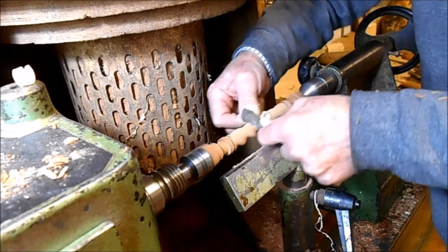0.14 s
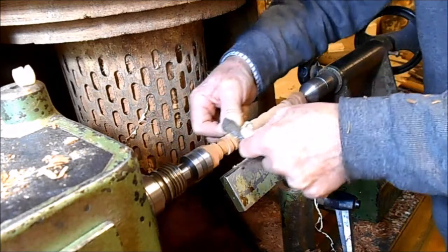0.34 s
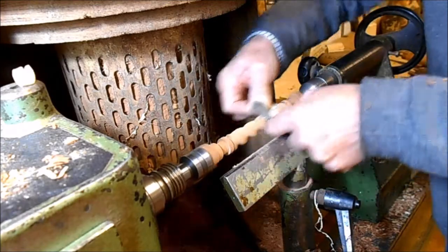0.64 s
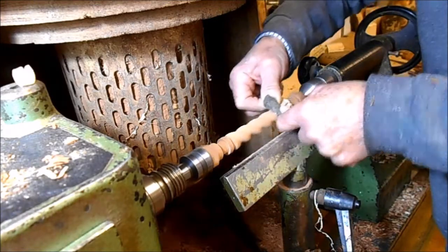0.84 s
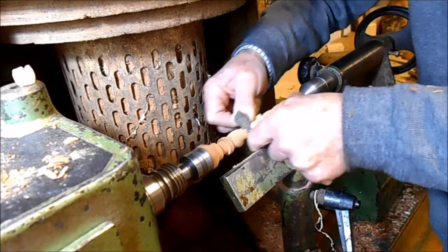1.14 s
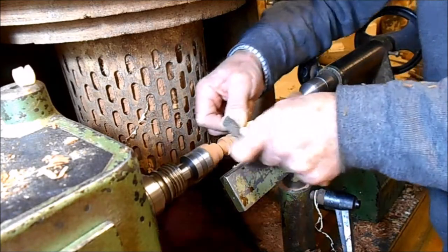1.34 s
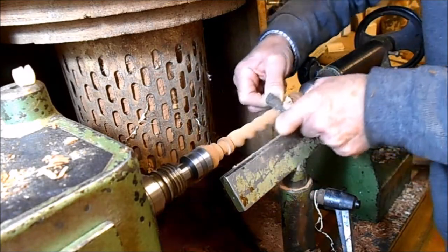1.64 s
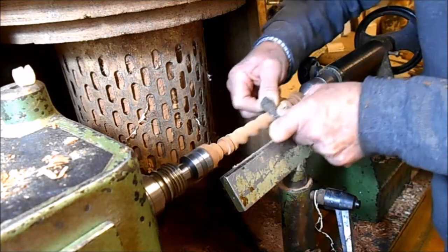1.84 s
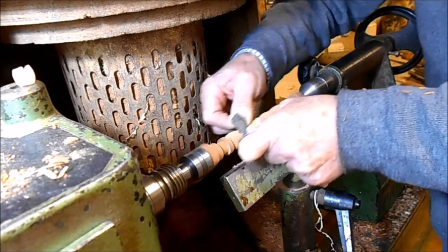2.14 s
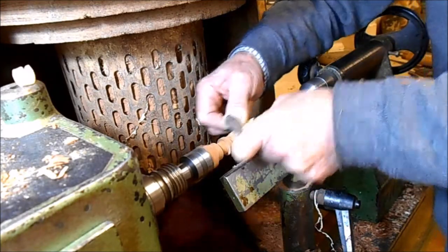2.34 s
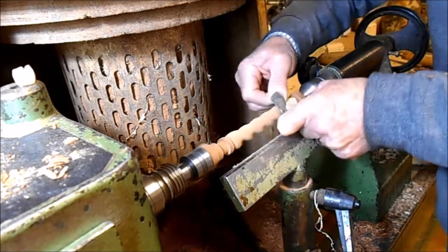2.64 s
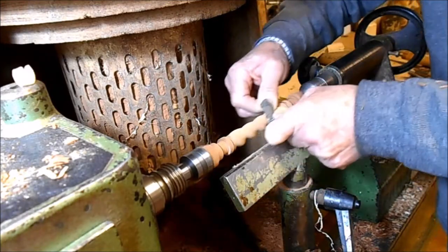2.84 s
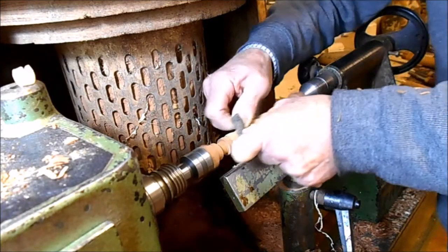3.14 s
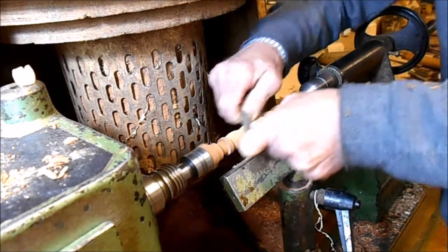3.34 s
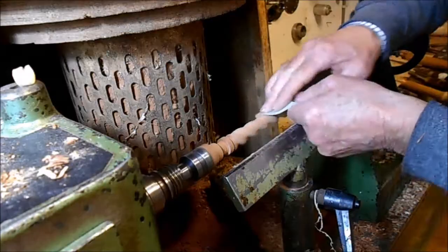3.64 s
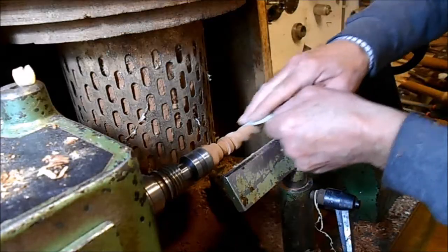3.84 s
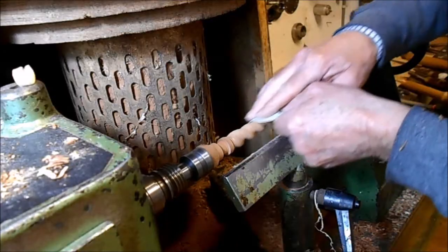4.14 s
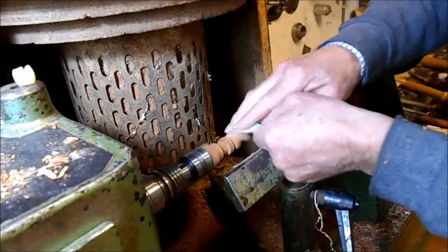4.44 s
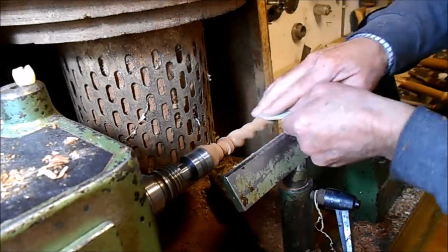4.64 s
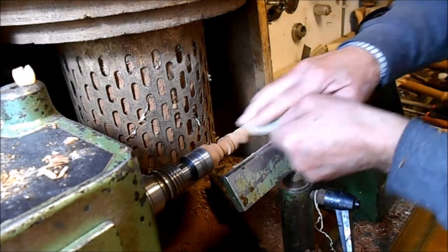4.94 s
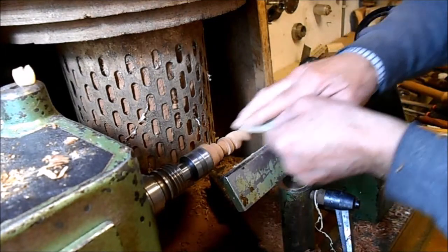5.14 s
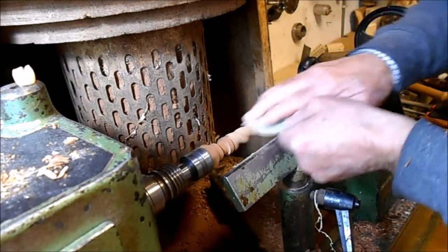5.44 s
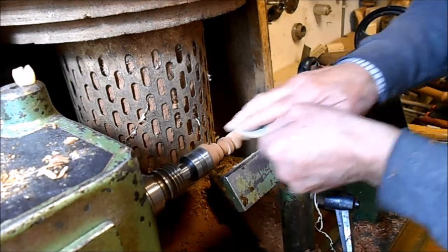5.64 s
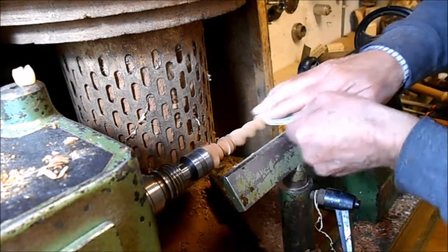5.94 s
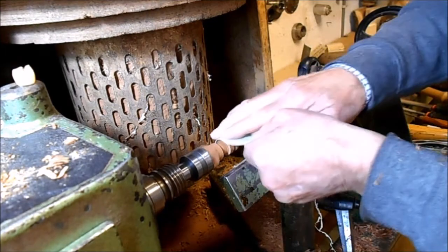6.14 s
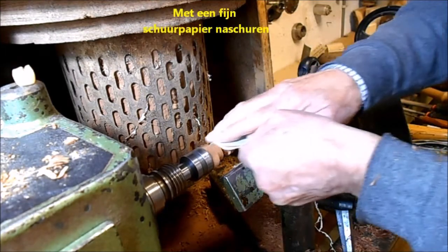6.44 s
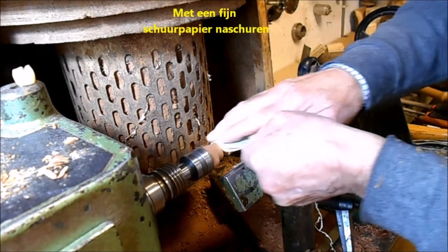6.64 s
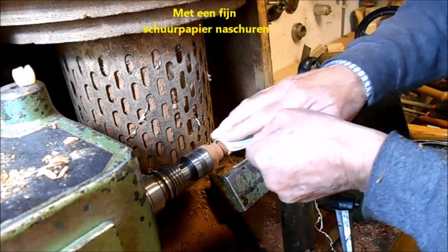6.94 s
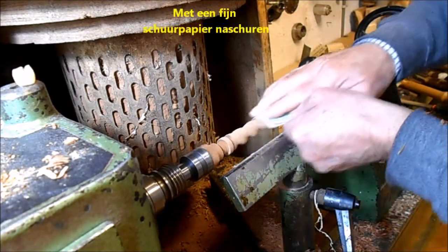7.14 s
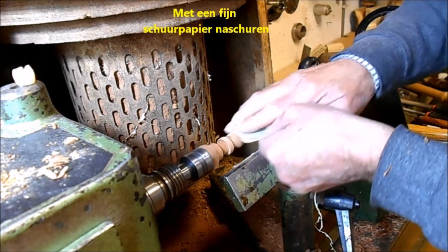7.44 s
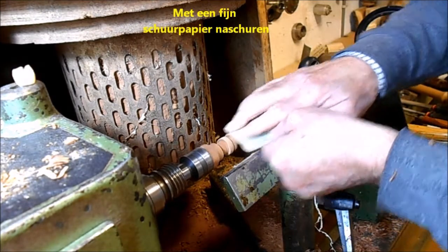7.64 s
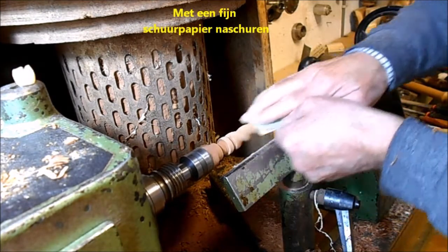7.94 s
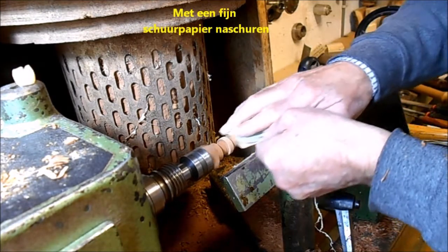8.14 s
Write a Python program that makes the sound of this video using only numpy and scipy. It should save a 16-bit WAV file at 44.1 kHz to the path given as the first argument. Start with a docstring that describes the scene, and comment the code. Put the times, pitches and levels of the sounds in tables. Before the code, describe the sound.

A lathe runs throughout, a steady hollow drone of motor hum, casing resonance and wavering spindle ring, with little deep bass. From 0 s a strip of sandpaper rasps along thin beaded wood in bright, grainy strokes. Around 0.45-0.6 s it catches and snaps sharply, then eases into softer, whistling scrapes until about 1.3 s. Stuttering snags come at 1.4-1.55 s and again near 2.4 s; quieter rubbing follows. A tiny bright flick sounds at 3.27 s, and a lull with a momentary dropout at 3.6 s. From 3.7 s a folded pad hisses louder and quicker, several strokes per second, with crackly catches near 4.6, 5.0, 5.4 and 5.85 s. Firm strokes continue from 6.3 s, with a hard snap at 7.57 s, still rubbing at the 8.3 s end. Close mono pickup, slightly clipped, occasionally thinning into watery tones.

```python
"""Grit hisses along a thin wooden spindle as a strip of abrasive, then a folded pad, is rubbed to and fro.
Dense random clicks are coloured by the paper's rings and whistles; they swell where it snags and slips off beads.
A running lathe drones below: noise shaped by casing, spindle and tailstock, plus steady sines from motor and shaft.
The strip's edge flicks once, and now and then the whole sound thins to a few tones for a moment."""
import sys
import numpy as np
from scipy import signal
from scipy.fft import rfft, irfft
from scipy.io import wavfile
from scipy.ndimage import uniform_filter1d

SR = 44100
rng = np.random.default_rng(int(sys.argv[2]) if len(sys.argv) > 2 else 0)


def to_wav(s):
    """Save 16-bit WAV."""
    ch = np.atleast_2d(s).T  # columns
    pcm = np.round(np.clip(ch, -1, 1) * 32767)  # PCM
    wavfile.write(sys.argv[1], SR, pcm.astype(np.int16))


N = 366471  # length in samples


def gain_of(db):
    """Amplitude gain of a level in dB."""
    return 10 ** (np.asarray(db) / 20)


def evened(x):
    """Scales x to rms 1."""
    return x / np.sqrt(np.mean(x ** 2) + 1e-20)


def read(points, hz):
    """Reads a spectrum curve between its points, along log frequency."""
    f, value = np.transpose(points)
    return np.interp(np.log(hz + 1), np.log(f + 1), value)


def curves(rows, t):
    """Reads each column of a table at times t; the first column is time in seconds."""
    s, *columns = np.transpose(rows)
    return [np.interp(t, s, c) for c in columns]


def bump(hz, centre_hz, width):
    """Power gain of a steep resonance, 1 at its centre."""
    return 1 / (1 + (2 * (hz - centre_hz) / width) ** 2) ** 2


def ring(hz, centre_hz, width):
    """A resonance whose power sums to 1 over frequency."""
    shape = bump(hz, centre_hz, width)
    return shape / shape.sum(0)


def share(power, hz, lo_hz, hi_hz):
    """Scales a spectrum so that one band holds power 1."""
    in_band = (hz[:, 0] > lo_hz) & (hz[:, 0] < hi_hz)
    return power / power[in_band].sum(0)


def drift(shape, span_t, span_f=1):
    """Random field over frequency and time, smoothed into patches, rms 1."""
    field = rng.standard_normal(shape[::-1]).T
    for _ in range(2):
        field = uniform_filter1d(field, max(int(span_t), 1), 1)
        field = uniform_filter1d(field, max(int(span_f), 1), 0)
    return evened(field)


def colour(x, magnitude, size):
    """Shapes x by a magnitude that is a function of (Hz column, s row)."""
    overlap = size * 3 // 4
    hz, t, z = signal.stft(x, SR, nperseg=size, noverlap=overlap)
    return signal.istft(z * magnitude(hz[:, None], t), SR, nperseg=size, noverlap=overlap)[1][:N]


# Steady tones of motor and shaft. Each row: frequency in Hz.
SHAFT_HZ = (72.9, 146.1, 236, 356, 398, 598, 679)
# Their levels before the sway. Each row: rms level in dB.
SHAFT_DB = (-64.5, -58.5, -47.5, -61, -61.5, -62, -47.5)
SHAFT_WAVER, SHAFT_SWAY_DB = 0.00407, 1  # rms share by which the speed wavers; rms swell of each tone


def shaft():
    """Sines locked to one slightly wavering speed, each swelling on its own."""
    t = np.arange(N) / SR
    slow = drift((len(SHAFT_HZ) + 1, N // 512 + 2), 12.0)
    slow = [np.interp(t, np.arange(len(v)) * 512 / SR, v) for v in slow]
    turns = np.cumsum(1 + SHAFT_WAVER * slow[-1]) / SR
    total = np.zeros(N)
    for hz, db, sway in zip(SHAFT_HZ, SHAFT_DB, slow):
        level = np.sqrt(2) * gain_of(db + SHAFT_SWAY_DB * sway)
        total += level * np.sin(2 * np.pi * (hz * turns + rng.random()))
    return total


# Load on the machine. Each row: time in seconds, drone drive in dB, tailstock ring against the drone in dB.
MACHINE = [(0, -29, -27), (.34, -28, -3), (.69, -32.5, -16), (1.38, -29.5, -6), (1.73, -31, -13),
           (2.08, -29, -11), (2.42, -30.5, -2.5), (2.77, -29.5, -12), (3.46, -29.5, -12), (3.81, -28, -10),
           (4.16, -30.5, -5), (5.2, -32, -9.5), (5.54, -34.5, -5.5), (6.23, -32.5, -9), (6.58, -28.5, -9),
           (7.27, -30, -19), (7.7, -30.5, -15), (8.31, -31, 2.5)]
# Tone of motor, belt, bearings and fan. Each row: frequency in Hz, relative level in dB per Hz.
DRONE = [(25, -25), (60, -35), (102, -22.5), (170, -19), (242, -4), (390, -13.5), (588, -8.5), (715, -3.5),
         (1150, -2), (1460, -3.5), (2300, -5), (4200, -5.5), (7000, -46), (10200, -12), (11000, -43)]
# The spindle rings under the strip and the pad damps it.
# Each row: time in seconds, frequency in Hz, level against the drone in dB.
SPINDLE = [(0, 980, -5), (.5, 920, -5.5), (.8, 940, -2), (1.15, 990, -7.5), (1.45, 920, -9), (1.9, 955, -1),
           (2.3, 920, -6), (2.6, 914, -3.5), (2.95, 930, -2.5), (3.3, 865, -5), (3.6, 940, -13),
           (3.9, 900, -12), (6, 910, -6), (8.31, 900, -27)]
# Casing resonances. Each row: centre in Hz.
CASING_HZ = (73, 212, 236, 262, 451, 528, 713, 770, 1010, 1139, 1240, 1356)
# The same resonances. Each row: width in Hz, rms level in dB, the upper ones once the pad has taken over.
CASING = [(25, -66), (14, -48.5), (20, -48), (16, -44), (25, -50), (35, -52), (24, -39), (40, -44.5),
          (40, -61), (30.4, -41), (40, -44.5), (44.5, -42.5)]
# The upper casing rings are weaker until the pad takes over. Row: rise start in seconds, rise end in seconds.
CASING_RISE_S = (3.4, 3.9)
CASING_EARLY_DB = -0.5  # upper casing rings before the rise
SPINDLE_WIDTH, TAIL_HZ, TAIL_WIDTH = 160, 2520, 170  # Hz


def lathe():
    """Noise shaped into a broad drone with steady casing rings; spindle and tailstock rings rise and fall."""
    def magnitude(hz, t):
        drone_db, tail_db = curves(MACHINE, t)
        spindle_hz, spindle_db = curves(SPINDLE, t)
        sway_db = 1.75 * drift((2, len(t)), 8.5)  # each ring swells and fades slowly at random
        waver = 1 + 0.021 * drift((2, len(t)), 6.5)  # the pitch of both rings wavers slightly at random
        power = gain_of(-1.5) ** 2 * share(gain_of(read(DRONE, hz)) ** 2, hz, 590, 1540)
        spindle = ring(hz, spindle_hz * waver[0], SPINDLE_WIDTH)
        power = power + gain_of(spindle_db + sway_db[0]) ** 2 * spindle
        tailstock = ring(hz, TAIL_HZ * waver[1], TAIL_WIDTH)
        power = power + gain_of(tail_db + sway_db[1]) ** 2 * tailstock
        follows = np.clip(hz / 900, .2, 1)  # the bass is steadier, the upper drone follows the load
        power *= gain_of(drone_db.mean() + follows * (drone_db - drone_db.mean())) ** 2
        power *= gain_of(1.8 * drift(power.shape, 4.5, 3.5)) ** 2  # the broad drone is patchy
        casing = sum(gain_of(db) ** 2 * ring(hz, f, w) for f, (w, db) in zip(CASING_HZ, CASING))
        early_db = np.interp(t, CASING_RISE_S, (CASING_EARLY_DB, 0)) * (hz > 600)
        power += casing * gain_of(early_db) ** 2
        return np.sqrt(power * len(hz))
    return colour(rng.standard_normal(N), magnitude, size=4096)


# The stiff edge of the strip flicks free.
# Row: middle in seconds, peak in dB before the microphone, frequency in Hz, length in seconds.
TICK = (3.265, 4, 8400, .0009)


def flick():
    """A few bright cycles of a sine under a bell-shaped swell."""
    s, db, hz, length = TICK
    u = np.arange(N) / SR - s
    return gain_of(db) * np.sin(2 * np.pi * hz * u) * np.exp(-(2 * u / length) ** 2)


# Strokes of the paper along the wood. Each row: peak in seconds, rise in seconds, fall in seconds,
# hiss in dB, low body of the bent paper against the hiss in dB, fine dust hiss against the hiss in dB.
STROKES = [(.08, .3, 0.18, -21.5, -15, -3), (.31, 0.24, 0.14, -23, -12, 0.5),
           (.55, 0.21, 0.34, -23, -3.5, -2), (.97, 0.18, 0.34, -27.5, -0.5, 2.5),
           (1.13, 0.22, 0.11, -27.5, -6, -8), (1.25, 0.11, 0.062, -24, -2, -0.5),
           (1.36, 0.08, 0.11, -30.5, 1, 0), (1.52, 0.11, 0.089, -25, 3.5, 0.5),
           (1.81, 0.19, 0.2, -25, -13.5, -2.5), (2.06, 0.21, 0.2, -26, -6, -1),
           (2.4, 0.2, 0.15, -20.5, 1, -1.5), (2.67, 0.11, 0.65, -30, -9.5, -1.5),
           (2.99, 0.44, 0.13, -26.5, -10, 2.5), (3.16, 0.13, 0.057, -25.5, -3, -4.5),
           (3.39, 0.19, 0.096, -24.5, 1, 0), (3.49, 0.073, 0.03, -25, -11, -2.5),
           (3.74, 0.1, 0.12, -20, -10, -1), (3.87, 0.098, 0.32, -20, -9, -2),
           (4.111, 0.12, 0.13, -17, -10, -1), (4.371, 0.11, 0.1, -19, -8, 1.5),
           (4.57, 0.077, 0.088, -18.5, -13, -1.5), (4.77, 0.12, 0.14, -22.5, -9, 0.5),
           (4.98, 0.086, 0.12, -22, -26, 0), (5.21, 0.19, 0.11, -26, -1, 2.5),
           (5.45, 0.13, 0.079, -22, -9.5, -2), (5.55, 0.18, 0.15, -27.5, -39, -2.5),
           (5.66, 0.13, 0.086, -27, 4, 5), (5.82, 0.029, 0.048, -16.5, -9.5, -4),
           (5.87, 0.035, 0.074, -19.5, -23, -1.5), (6.04, 0.073, 0.11, -24.5, -18, 1.5),
           (6.329, 0.11, 0.17, -21.5, -10, -0.5), (6.54, 0.029, 0.063, -24, -29, -8),
           (6.66, 0.17, 0.048, -21, -7, 1.5), (6.78, 0.11, 0.082, -23, -15, 0.5),
           (6.91, 0.13, 0.071, -19.5, -3, -1), (7.05, 0.12, 0.15, -18, -10, -2.5),
           (7.15, 0.11, 0.028, -17.5, -36, -1.5), (7.3, 0.11, 0.1, -19.5, -22, -2),
           (7.51, 0.49, 0.086, -22, -8, -1), (7.71, 0.078, 0.12, -16.5, -9.5, -4.5),
           (7.98, 0.17, 0.056, -19.5, -20, -4), (8.2, 0.61, 0.21, -21.5, -9, -2)]
# A stroke is this far down one rise before and one fall after its peak; point 1 = pointed, 2 = round.
STROKE_DROP_DB, STROKE_POINT = 11.5, 2.12
TOUCH_DB, TOUCH_BEND_DB, TOUCH_DUST_DB = -35.5, -21.5, 0  # the paper barely touching, between strokes


def strokes(t):
    """Hiss level, paper body and dust at times t: strokes add up in power, the loudest weigh most in the colour."""
    peak, rise, fall, hiss_db, bend_db, dust_db = np.transpose(STROKES)[:, :, None]
    u = np.where(t < peak, (peak - t) / rise, (t - peak) / fall)
    power = gain_of(hiss_db - STROKE_DROP_DB * np.minimum(u, 9) ** STROKE_POINT) ** 2
    touch = gain_of(TOUCH_DB) ** 2
    total = power.sum(0) + touch
    bend = ((power * bend_db).sum(0) + touch * TOUCH_BEND_DB) / total
    dust = ((power * dust_db).sum(0) + touch * TOUCH_DUST_DB) / total
    return 10 * np.log10(total), bend, dust


# Grit on wood. Each row: frequency in Hz, relative level in dB per Hz.
GRIT = [(1500, -34.5), (2600, -17), (4000, -13), (4330, -12), (4600, -2), (5250, -3.5), (6000, -3),
        (7300, -2.5), (9000, -4), (10000, -7.5), (10500, -14.5), (10900, -26), (14000, -36)]
# Fixed rings of the paper. Each row: frequency in Hz, width in Hz, level against the grit in dB.
PAPER = [(5810, 300, 0), (6600, 250, -3), (7670, 500, -1), (8800, 300, -3)]
# Pitch of the bent paper as the grip changes. Each row: time in seconds, frequency in Hz.
BEND = [(0, 3400), (.33, 3300), (.43, 3500), (.75, 3660), (1.5, 3580), (1.8, 3140), (2.35, 3540),
        (2.65, 3140), (3.35, 3680), (3.65, 3420), (4, 3350), (4.4, 3270), (4.6, 3520), (5.5, 3430),
        (6.2, 2680), (7.1, 3040), (7.4, 3000), (7.8, 3380), (8.31, 3030)]
# Narrow whistling scrapes in the hiss.
# Each row: start in seconds, end in seconds, start pitch in Hz, end pitch in Hz, peak against the hiss in dB.
WHISTLES = [(0.09, .42, 4500, 4640, -6), (.52, 0.677, 3370, 3470, -2.5), (0.757, 1.185, 5054, 4640, -2.5),
            (1.22, 1.33, 3850, 3880, -1), (1.296, 1.435, 3930, 3900, 1.5), (1.486, 1.738, 3500, 3800, -7),
            (1.502, 1.78, 4860, 5050, -3.5), (0.835, 0.928, 7020, 7240, 4), (2.2, 2.44, 3780, 3750, -10),
            (2.362, 2.573, 3320, 3750, -5), (2.56, 2.76, 5080, 4880, -1), (2.75, 2.952, 4750, 4940, -4),
            (2.97, 3.06, 6600, 6560, -3), (3.05, 3.24, 3800, 3850, -6.5), (3.3, 3.44, 3800, 4150, -5),
            (3.4, 3.53, 3650, 3600, -6), (3.3, 3.53, 4880, 4900, -6), (3.62, 4, 4830, 4700, -9),
            (3.993, 4.17, 5800, 5680, -3.5), (4.34, 4.543, 5760, 5470, -1.5), (4.7, 4.9, 4660, 4600, -19),
            (5.904, 6.098, 4900, 4660, -9), (6.198, 6.68, 4760, 4840, -11), (6.74, 6.92, 3900, 3920, -15.5),
            (6.552, 6.72, 2620, 2630, -9), (6.85, 7.1, 2700, 2750, -15), (7.276, 7.8, 2670, 2850, -14),
            (7.617, 7.847, 4320, 4700, -5.5), (7.898, 8.3, 4540, 4350, -4.5), (7.96, 8.15, 3050, 3100, -7),
            (8.15, 8.31, 2790, 2750, -9)]
BEND_WIDTH, WHISTLE_WIDTH, REST_HZ, REST_WIDTH = 1100, 190, 4780, 500  # Hz
REST_DB, REST_FOLLOWS = -34, 0.39  # ring of the tool rest at a hiss of -25 dB, and its share of any swell


def paper_colour(hz, t):
    """Grit spectrum, tilted by the stroke, with the rings and whistles of the moment."""
    hiss_db, bend_db, dust_db = strokes(t)
    bend_hz, = curves(BEND, t)
    rest_db = REST_DB + REST_FOLLOWS * (hiss_db + 25) - hiss_db  # against the hiss
    rings = sum(gain_of(db) ** 2 * bump(hz, f, w) for f, w, db in PAPER)
    hiss = share(gain_of(read(GRIT, hz)) ** 2 * (1 + rings), hz, 4400, 7200)
    power = hiss * gain_of(dust_db * np.clip((hz - 6300) / 1500, 0, 1)) ** 2  # dust tilts the top
    power += gain_of(bend_db) ** 2 * ring(hz, bend_hz, BEND_WIDTH)
    power += gain_of(rest_db) ** 2 * ring(hz, REST_HZ, REST_WIDTH)
    for start, end, start_hz, end_hz, db in WHISTLES:
        u = np.clip((t - start) / (end - start), 0, 1)
        whistle = ring(hz, start_hz + u * (end_hz - start_hz), WHISTLE_WIDTH)
        power += gain_of(db) ** 2 * np.sin(np.pi * u) * whistle
    # short broad patches, then long narrow ones
    patches_db = 1.8 * drift(power.shape, 4.5, 5.5) + 1.4 * drift(power.shape, 17.5, 2.5)
    return np.sqrt(power * len(hz)) * gain_of(patches_db)


# The paper catches on a bead, a swell of grit. Each row: middle in seconds, level in dB, length in seconds.
SNAGS = [(0.449, -22, 0.0055), (0.476, -18.5, 0.015), (0.57, -18, 0.01), (1.393, -24, 0.016),
         (1.45, -20.5, 0.012), (1.489, -21, 0.0092), (1.502, -23, .008), (1.523, -19.5, 0.018),
         (1.554, -25, .012), (2.3, -32, 0.013), (2.335, -36, 0.0084), (2.383, -25, .02), (2.4, -18, 0.009),
         (2.426, -23, .008), (2.46, -25, .01), (2.526, -25.5, .015), (2.624, -26, .009),
         (2.662, -24, 0.013), (3.32, -27, .012), (3.366, -20.5, 0.015), (3.41, -23, 0.011),
         (3.501, -23.5, .015), (3.533, -27, 0.0092), (3.608, -26, 0.078), (4.569, -13.5, 0.011),
         (4.614, -26, 0.017), (4.675, -22, 0.009), (4.942, -15, 0.017), (4.977, -17.5, 0.015),
         (5.014, -17.5, 0.0099), (5.15, -34, 0.018), (5.38, -17, 0.017), (5.418, -14.5, 0.0067),
         (5.435, -18, .006), (5.457, -19, 0.01), (5.484, -19.5, 0.02), (5.71, -41, 0.01),
         (5.858, -16.5, 0.014), (5.91, -21, 0.017), (6.77, -21.5, 0.025), (7.06, -17, 0.013)]
# The paper slips off a bead: grit bursts at once and dies away.
# Each row: start in seconds, level in dB, decay in seconds.
SNAPS = [(.4607, -4, .0016), (0.4663, -6.5, .0025), (0.471, -8, .002), (.4782, -8, .002),
         (.4968, -25, .001), (0.5706, -7.5, 0.0016), (1.337, -25, 0.0041), (1.5155, -13, .004),
         (2.3525, -21, 0.0027), (2.4115, -11, .001), (3.266, -17, .007), (3.465, -17, .006),
         (5.416, -13, .006), (5.447, -10, .005), (7.5687, -6, .001)]
SNAP_RISE_S = 0.00056


def rubbing():
    """Dense grit clicks in clumps, coloured by the paper; the force swells at each stroke, snag and snap."""
    t = np.arange(N) / SR
    size = gain_of(1.3 * np.minimum(rng.exponential(1, N), 4)) * (rng.random(N) < .6)
    clumps_db = 0.63 * drift((1, N), 430.0)[0]
    grit = evened(size * rng.standard_normal(N) * gain_of(clumps_db))
    coarse_t = t[::64]
    force = gain_of(np.interp(t, coarse_t, strokes(coarse_t)[0])) ** 2  # in power
    for s, db, length in SNAGS:
        force += gain_of(db) ** 2 * np.exp(-(2 * (t - s) / length) ** 2)
    for s, db, decay in SNAPS:
        rise = np.clip((t - s) / SNAP_RISE_S, 0, 1)
        force += (gain_of(db) * rise * np.exp(-np.maximum(t - s, 0) / decay)) ** 2
    return colour(grit, paper_colour, size=1024) * np.sqrt(force)


# The whole sound thins to its few strongest tones, in one or more short steps.
# Each row: middle in seconds, number of steps, number of tones in a step.
THINNINGS = [(.636, 2, 8), (.892, 2, 9), (.945, 1, 2), (1.04, 2, 8), (1.755, 1, 9), (1.884, 1, 9),
             (2.843, 3, 9), (3.058, 1, 7), (3.288, 1, 5), (3.632, 1, 7), (4.017, 1, 9), (4.145, 1, 14),
             (4.23, 1, 10), (4.528, 1, 10), (5.062, 1, 9), (5.126, 1, 9), (5.19, 1, 10), (5.51, 1, 5),
             (5.68, 1, 9), (6.087, 1, 9), (6.256, 1, 12), (6.641, 1, 12), (6.895, 1, 9), (7.121, 2, 16),
             (8.262, 1, 7)]
THIN_STEP_S, TONES_APART_HZ = .023, 330  # from one step to the next; least distance between tones
LOW_TONES_FAVOURED = .16  # exponent that ranks low tones higher
TONES_DB, NOISE_LEFT_DB = 3, -40  # boost of the tones; floor of the faded sound


def thinned(x):
    """In each step the noise fades out and in again while its strongest tones swell and fade in its place."""
    n = round(THIN_STEP_S * SR)
    swell = np.sin(np.pi * (np.arange(2 * n) + .5) / (2 * n))
    hz = np.fft.rfftfreq(2 * n, 1 / SR)
    missing, chirps = np.zeros(N), np.zeros(N)
    for s, steps, tones in THINNINGS:
        for k in range(steps):
            at = round(s * SR + (k - (steps + 1) / 2) * n) + np.arange(2 * n)
            z = rfft(x[at] * swell)
            rank = abs(z) / (hz + 300) ** LOW_TONES_FAVOURED
            tops = signal.find_peaks(rank, distance=TONES_APART_HZ / hz[1])[0]
            strongest = tops[np.argsort(-rank[tops])[:tones]]
            kept = np.isin(np.arange(len(z)), strongest)
            chirps[at] += swell * irfft(z * kept, 2 * n) / swell.mean()
            missing[at] += swell ** 2
    left = np.sqrt(np.maximum(1 - missing, gain_of(NOISE_LEFT_DB) ** 2))
    return x * left + gain_of(TONES_DB) * chirps


def scene():
    """Sums lathe, shaft, rubbing and flick, thins the mix, and feeds it to both channels."""
    mix = lathe() + shaft() + rubbing() + flick()
    return np.tile(thinned(mix), (2, 1))


# The sound stops dead for an instant. Row: from in seconds, to in seconds.
GAP = (3.5982, 3.6)
EDGE_HZ, TOP_HZ = 10950, 16000  # treble limit before clipping, and after it


def record(dry):
    """The microphone lacks deep bass and high treble; the loudest snaps clip and splash above its range."""
    thin = signal.sosfilt(signal.butter(1, 45, "high", fs=SR, output="sos"), dry)
    thin = thin / (1 + abs(thin / .95) ** 6) ** (1 / 6)  # the capsule rounds off peaks
    edge = signal.firwin(255, EDGE_HZ, window=("kaiser", 9), fs=SR)
    heard = signal.oaconvolve(thin, edge[None], "same")
    t = np.arange(N) / SR
    clipped = np.clip(heard, -.97, .97) * ((t < GAP[0]) | (t > GAP[1]))
    top = signal.firwin(255, TOP_HZ, window=("kaiser", 9), fs=SR)
    return signal.oaconvolve(clipped, top[None], "same")


dry = scene()
out = record(dry)
to_wav(out)
```